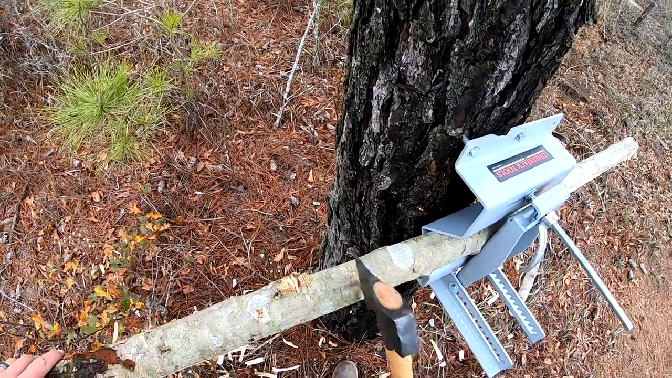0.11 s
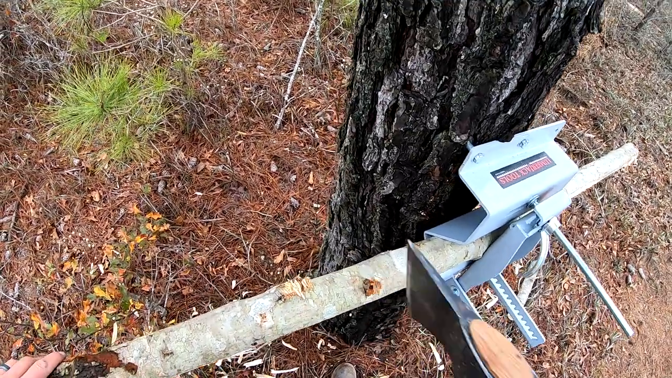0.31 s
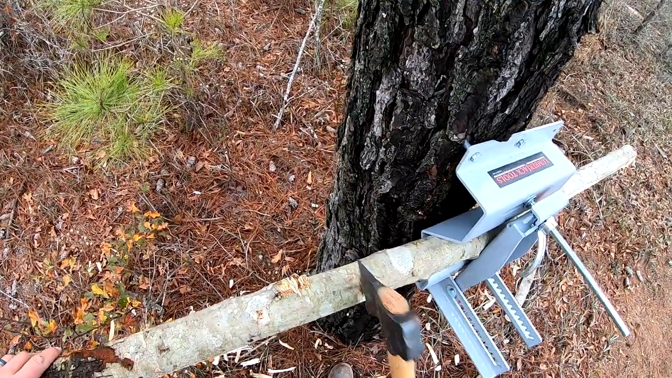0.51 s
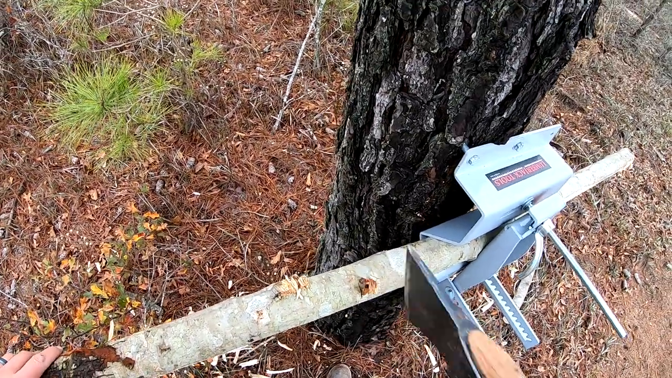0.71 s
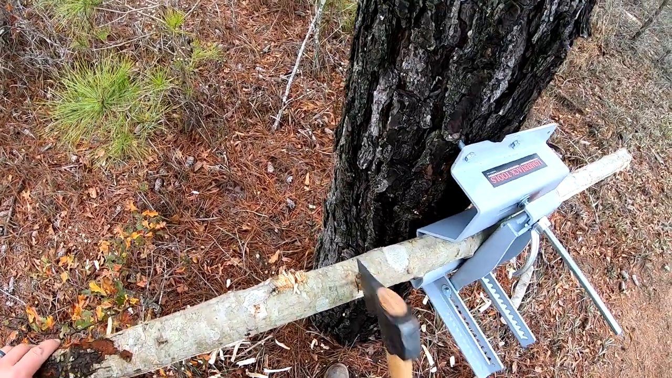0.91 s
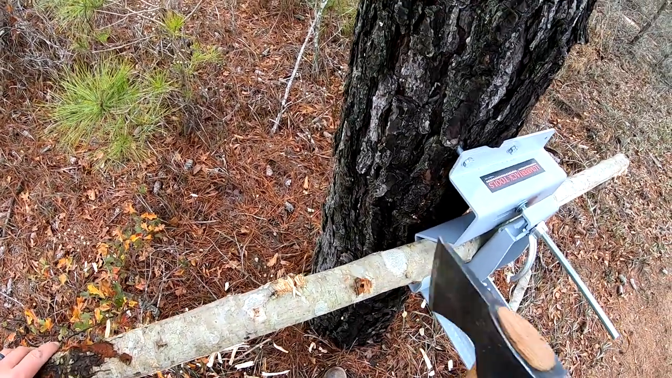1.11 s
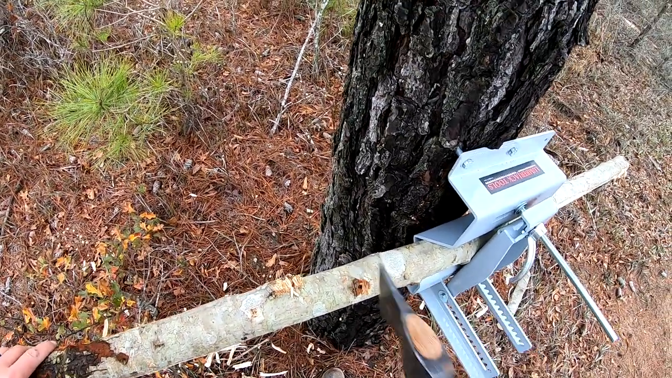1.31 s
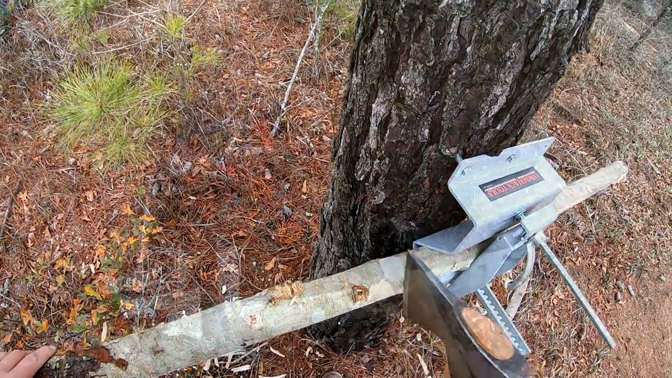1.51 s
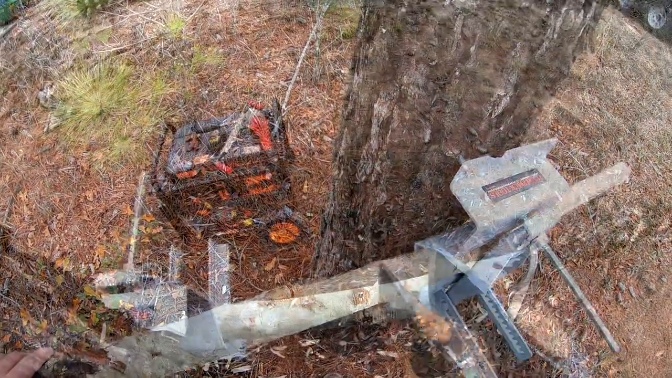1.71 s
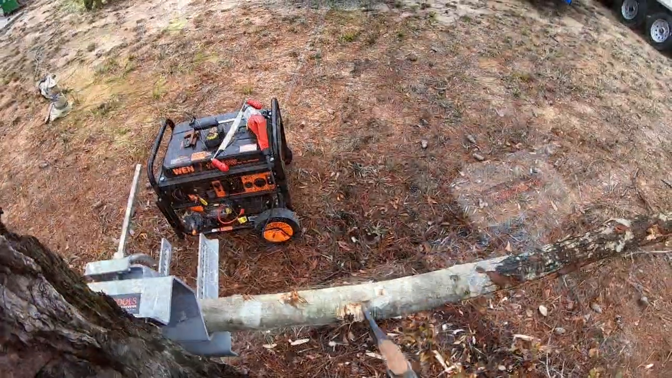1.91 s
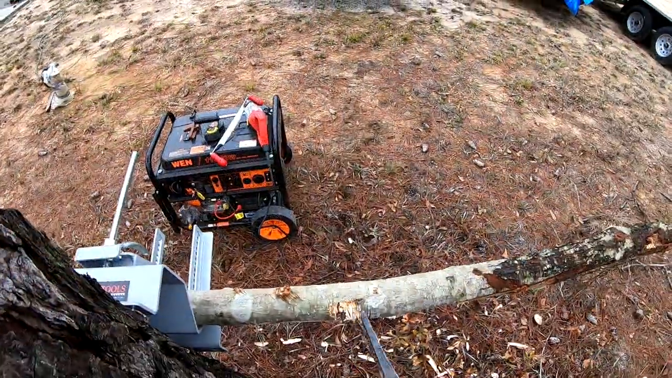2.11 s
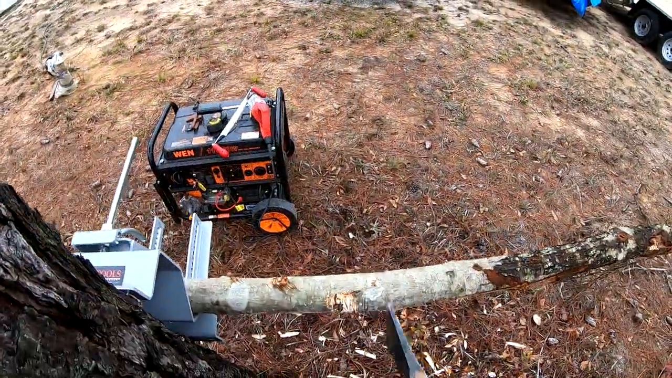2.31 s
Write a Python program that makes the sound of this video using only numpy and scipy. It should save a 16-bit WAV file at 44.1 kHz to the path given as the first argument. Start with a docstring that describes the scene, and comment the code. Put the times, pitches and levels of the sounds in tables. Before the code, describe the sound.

Close, regular hatchet chops: brief graze, sharp woody crack and crunch, then loose clamp chatter and faint metallic ringing. Near the end one blow on another log shudders as low wind swells. Outdoors among trees, microphone on the head.

```python
"""A hatchet chops at a thin log held in a steel clamp on a tree trunk, about a metre from a head-worn camera.
Each blow grazes, rings the log's decaying modes, crunches, thuds and cracks in shaped noise; the trees echo.
The clamp rattles as dense clicks through resonances and its steel rings; the blade pings and sizzles.
Late on, a second scene comes in, where a blow rings a second log with other modes and that log shudders.
Around it lie wind on the microphones, quiet woodland hiss, small ticks and faint sliding bird notes."""
import sys
import numpy as np
from scipy import signal
from scipy.fft import rfft, irfft
from scipy.io import wavfile
from scipy.ndimage import uniform_filter1d

SR = 44100
rng = np.random.default_rng(int(sys.argv[2]) if len(sys.argv) > 2 else 0)


def log_audio(samples):
    """Write samples as a 16-bit WAV file to the path given in sys.argv[1]."""
    # one column per channel
    frames = np.atleast_2d(samples).T
    # limit to full scale, then quantise
    limited = np.clip(frames, -1, 1)
    pcm = np.round(limited * 32767).astype(np.int16)
    wavfile.write(sys.argv[1], SR, pcm)


N = 105840
LEAD = SR // 4  # samples made ahead of the scene, so earlier sounds can ring into it
PORT_LEAD_S = 2e-5  # the left port hears the sound this much before the right
RISE_CYCLES = 0.15  # time constant of each mode's onset, in its own cycles


def undb(db):
    """Decibels to amplitude."""
    return 10 ** (np.asarray(db) / 20)


def unit(x):
    """Scale to an rms of 1, over both channels together."""
    return x / np.sqrt(np.mean(x ** 2))


def clock():
    """Time in seconds, starting a little before the scene."""
    return (np.arange(N + LEAD) - LEAD) / SR


def level_curve(points):
    """Level in dB over time, drawn straight between (time [s], level [dB]) points."""
    return np.interp(clock(), *np.array(points).T)


def colour(x, points):
    """Filter by (frequency [Hz], level [dB]) points; silent outside them."""
    hz, db = np.array(points, float).T
    f = np.fft.rfftfreq(x.shape[-1], 1 / SR) + 1  # the extra 1 Hz avoids log(0)
    inside = (f >= hz[0]) & (f <= hz[-1])
    gain = undb(np.interp(np.log(f), np.log(hz), db)) * inside
    return irfft(rfft(x) * gain, x.shape[-1])


def spread(mid, side, wide):
    """Mid and side to left and right; the left port hears a moment earlier."""
    turn = np.exp(1j * np.pi * np.fft.rfftfreq(len(mid), 1 / SR) * PORT_LEAD_S)
    left_right = [mid + wide * side, mid - wide * side]
    return irfft(rfft(left_right) * [turn, 1 / turn], len(mid))


def hiss(points, wide):
    """Stereo coloured noise of rms 1."""
    mid, side = colour(rng.standard_normal((2, N + LEAD)), points)
    return unit(spread(mid, side, wide))


def walk(rate):
    """Smooth random wander of rms 1, with about `rate` new values a second."""
    k = int(SR / rate)
    steps = np.repeat(rng.standard_normal((N + LEAD) // k + 1), k)
    return unit(uniform_filter1d(steps, k)[:N + LEAD])


def ring(modes, seconds):
    """Stereo impulse response of decaying modes; neighbours start opposite, low ones swell later."""
    t = np.arange(int(seconds * SR)) / SR
    hz, db, t60, lead, pan_db = np.array(modes, float).T[:, :, None]
    sign = (-1.) ** np.arange(len(modes))[:, None]
    swell = sign * (1 - np.exp(-t * hz / RISE_CYCLES))
    ears = []
    for side in (1, -1):  # left, right
        decay = undb(db + side * pan_db / 2 - 60 * t / t60)
        tone = np.sin(2 * np.pi * hz * t + side * lead / 2)
        ears.append(np.sum(swell * decay * tone, axis=0))
    return np.array(ears)


def add(out, s, x):
    """Mix x into out at s seconds, cut at the end."""
    i = int(s * SR) + LEAD
    x = x[..., :out.shape[-1] - i]
    out[..., i:i + x.shape[-1]] += x


def resonate(x, peaks):
    """Sum of resonant band-passes."""
    return sum(undb(db) * signal.lfilter(*signal.iirpeak(hz, hz / width, SR), x) for hz, width, db in peaks)


def clicks(rate, scatter_db):
    """Two streams of dense clicks at random moments with uneven levels."""
    shape = (2, N + LEAD)
    struck = rng.random(shape) < rate / SR
    return struck * rng.standard_normal(shape) * undb(scatter_db * rng.exponential(size=shape))


def burst(s, db, hold_s, sag_db_s, t60):
    """Envelope with a quick rise, a slow sag while held, then a decay."""
    t = clock() - s
    rise = (t >= 0) * np.clip(t / 0.0013, 0, 1)
    sag = sag_db_s * np.clip(t, 0, hold_s)
    decay = 60 * np.clip(t - hold_s, 0, 9) / t60
    return rise * undb(db - sag - decay)


# wind strength before its flicker: (time [s], level [dB])
WIND_LEVEL = [(0.0, -57.5), (0.18, -64), (0.56, -73), (0.81, -61.5), (1.0, -57), (1.22, -66.5),
              (1.42, -68.5), (1.56, -41), (1.88, -57.5), (2.04, -40), (2.17, -47.5), (2.4, -52.5)]
# low rumble of wind on the ports: (frequency [Hz], relative level [dB])
WIND_COLOUR = [(15, -11), (25, -2), (45, -7.5), (75, 0), (110, -6.5), (160, -15.5), (250, -21), (400, -39)]
WIND_FLICKER_DB, WIND_WIDE = 3, .55


def wind():
    """Wind buffets the ports: low noise with a drawn level and a random flicker."""
    level_db = level_curve(WIND_LEVEL) + WIND_FLICKER_DB * walk(12)
    return hiss(WIND_COLOUR, WIND_WIDE) * undb(level_db)


# soft hiss of the wood: (frequency [Hz], relative level [dB])
AIR_COLOUR = [(70, -8), (130, -5), (250, -7.5), (450, -17.5), (700, -17), (1100, -24), (1700, -29.5),
              (2700, -36), (4500, -40.5), (7500, -43.5), (9000, -49), (11000, -68.5)]
# strength of that hiss before its flicker: (time [s], level [dB])
AIR_LEVEL = [(0.0, -55.5), (1.0, -60), (1.18, -61.5), (1.43, -61), (1.55, -58.5), (1.85, -52.5),
             (2.02, -47.5), (2.27, -50.5), (2.4, -56.5)]
AIR_WIDE, AIR_FLICKER_DB = 0.49, 1


def woodland_air():
    """The wood hisses softly: broad noise with a drawn level and a slight flicker."""
    level_db = level_curve(AIR_LEVEL) + AIR_FLICKER_DB * walk(7.11)
    return hiss(AIR_COLOUR, AIR_WIDE) * undb(level_db)


# first-scene blows: (time [s], knock level [dB], contact [ms], crack level [dB], second graze level [dB],
# rebound level [dB], rattle level [dB], rattle hold [s]); knock, graze and rebound scale the log's modes
FIRST_SCENE_BLOWS = [(-.18, -22, .5, -32, -44, -30, -41, 0.13),
                     (.2213, -14.5, 0.55, -22, -37, -39, -43.5, .11),
                     (.6233, -15.5, 0.44, -26, -38, -34, -42.5, 0.14),
                     (1.0255, -19, 0.49, -21, -45, -39.5, -38.5, 0.083),
                     (1.4443, -18.5, 0.62, -36.5, -39, -23.5, -37.5, 0.095),
                     (1.8425, -19.5, 0.54, -26.5, -41.5, -58, -43, 0.11),
                     (1.3915, -35.5, 0.56, -40, -68.5, -58, -53.5, 0.1),
                     (2.235, -37, 0.54, -41.5, -56, -46.5, -66, 0.0082)]
# second-scene blows, same columns
SECOND_SCENE_BLOWS = [(1.954, -55, 2, -67, -76, -46.5, -61.5, 0.016),
                      (2.0493, -21.5, 0.93, -23, -70, -35.5, -36.5, 0.064)]
# modes of the first log:
# (frequency [Hz], relative level [dB], t60 [s], left phase lead [rad], left minus right [dB])
FIRST_LOG = [(151.7, -1.5, 0.089, .08, -2), (197.8, 2.5, 0.049, .15, 3), (148.24, -7.5, 0.31, 0.074, -0.5),
             (433, -3, 0.036, 0.18, -2.5), (566.6, -4.5, 0.038, .2, -8), (761.5, 3, 0.057, 0.44, -1.),
             (900, -6, 0.051, .35, -10), (1110.5, -7, 0.12, 1, -5), (1264, -3.5, 0.058, 0.4, -7),
             (1456, -1.5, 0.066, 0.23, -10), (2117, 7, 0.026, 0, -10), (2346, -8, 0.022, 0.708, -11.5),
             (2750, -12, 0.12, 0.85, -5), (3420, -15.5, .03, 0, -6)]
# modes of the second log, same columns
SECOND_LOG = [(136.5, 4.5, 0.17, 0.038, 0.), (256, -4.5, 0.053, 0.11, 0.85), (315, -10, .06, 0, 0.87),
              (487, 5, 0.025, .2, 1.), (600, 1.5, 0.066, 0.21, 0.75), (850, -6, 0.044, 1, 0.85),
              (1375, 10, .05, .6, 0.82), (1520, -2, 0.041, .6, 1.), (2220, -8, 0.026, 0.4, 1.),
              (2800, -10, .03, 0.85, 1.)]
FIRST_GRAZE_LEAD_S, SECOND_GRAZE_LEAD_S, REBOUND_S = .0215, .011, .008  # before, before, after the bite
FIRST_GRAZE_DB = -10.5  # relative to the second graze
MODE_SCATTER_DB = 1.5  # each blow excites the modes a little differently


def log_knocks(blows, modes):
    """The edge grazes twice, bites and rebounds; each half-sine push rings the log's modes."""
    out = np.zeros((2, N + LEAD))
    for s, knock_db, contact_ms, _, graze_db, rebound_db, _, _ in blows:
        phase = np.clip(np.arange(200) / SR / (contact_ms / 1000), 0, 1)
        push = np.sin(np.pi * phase)[None]
        push = push / push.sum()
        varied = np.array(modes, float)
        varied[:, 1] += MODE_SCATTER_DB * rng.standard_normal(len(modes))
        knock = signal.fftconvolve(ring(varied, 0.36), push)
        graze = signal.fftconvolve(ring(varied[3:7], 0.36), push)  # a graze wakes only four modes
        add(out, s - FIRST_GRAZE_LEAD_S, undb(graze_db + FIRST_GRAZE_DB) * graze)
        add(out, s - SECOND_GRAZE_LEAD_S, undb(graze_db) * graze)
        add(out, s, undb(knock_db) * knock)
        add(out, s + REBOUND_S, undb(rebound_db) * knock)
    return out


# crushed fibres: (frequency [Hz], relative level [dB])
CRUNCH_COLOUR = [(180, -28), (260, 2.5), (500, 1), (1000, -0.5), (1600, -7), (2500, -6.5), (4000, -22)]
GRAZE_HISS_DB, GRAZE_RISE_S = -5, 0.0074  # level relative to the second graze
CRUNCH_DB, CRUNCH_HOLD_S, CRUNCH_T60_S = -6, 0.0092, 0.066  # level relative to the knock
CRUNCH_WIDE = .15


def fibre_crunch(blows):
    """Hiss grows as the edge grazes in, then crushed fibres crunch and die away."""
    level = 0
    for s, knock_db, _, _, graze_db, _, _, _ in blows:
        t = clock() - s
        approach = (t < 0) * np.exp(np.minimum(t, 0) / GRAZE_RISE_S)
        level = level + undb(graze_db + GRAZE_HISS_DB) * approach
        level = level + burst(s, knock_db + CRUNCH_DB, CRUNCH_HOLD_S, 0, CRUNCH_T60_S)
    return level * hiss(CRUNCH_COLOUR, CRUNCH_WIDE)


# dull thud: (frequency [Hz], relative level [dB])
THUD_COLOUR = [(22, -14), (40, -10), (62, 6.5), (85, -7.5), (110, -24)]
THUD_DB, THUD_PEAK_S, THUD_WIDE = -22.5, 0.029, .5  # level relative to the knock


def dull_thud(blows):
    """Deep noise swells just after each blow and sinks again."""
    swell = 0
    for s, knock_db, *_ in blows:
        u = np.clip(clock() - s, 0, 9) / THUD_PEAK_S
        swell = swell + undb(knock_db + THUD_DB) * u * np.exp(1 - u)
    return swell * hiss(THUD_COLOUR, THUD_WIDE)


TREES_DB, TREES_T60_S = -20, 0.42


def tree_echo(hits):
    """The trees return the hits above 900 Hz as a diffuse noise tail, starting 10 ms late."""
    t = np.arange(SR // 2) / SR
    tail = rng.standard_normal((2, len(t))) * undb(-60 * t / TREES_T60_S) * (t > .01)
    tail = tail / np.sqrt(np.sum(tail ** 2) / 2)
    bright = signal.sosfilt(signal.butter(2, 900, "high", fs=SR, output="sos"), hits)
    return undb(TREES_DB) * signal.fftconvolve(bright, tail, axes=1)[:, :N + LEAD]


# bright crack: (frequency [Hz], relative level [dB])
CRACK_COLOUR = [(880, -12.5), (1500, 3), (1710, -32), (2660, -8.5), (4240, -18.5), (6760, -22.5),
                (7540, -24), (9010, -28), (12000, -66), (16000, -61)]
CRACK_T60_S, CRACK_WIDE = 0.053, 0.48


def crack():
    """A short bright noise burst at every blow."""
    blows = FIRST_SCENE_BLOWS + SECOND_SCENE_BLOWS
    level = sum(burst(b[0], b[3], 0.001, 0, CRACK_T60_S) for b in blows)
    return hiss(CRACK_COLOUR, CRACK_WIDE) * level


# body of the clamp's chatter: (frequency [Hz], relative level [dB])
RATTLE_COLOUR = [(150, -16), (250, 1.5), (519, -7.5), (1310, -13.5), (1670, -22.5), (2670, -8.5),
                 (6470, -18), (7980, -14), (9010, -26), (13400, -70), (16000, -71.5)]
# resonances of the loose steel: (frequency [Hz], width [Hz], relative level [dB])
RATTLE_PEAKS = [(1323, 43, -7.5), (2040, 14, -10), (2582, 48, -10.5), (3160, 25, -49), (3336, 33, -11.5),
                (3364, 45, -11.5), (4075, 16, -9), (4463, 52, -11), (4690, 27, -15), (5270, 18, -13.5),
                (5830, 33, -14.5), (7560, 40, -15)]
RATTLE_PER_S, RATTLE_SCATTER_DB = 5000, 2.5  # clicks per second, unevenness
RATTLE_SAG_DB_S, RATTLE_T60_S, RATTLE_WIDE = 73, 0.21, 0.3
RATTLE_RING_DB = -0.5  # resonances relative to the body
RATTLE_PATCHY_DB, SECOND_DULL_HZ = 1.5, 6500


def flat_clicks():
    """Nearly flat clicks, band-limited, to drive resonances."""
    return colour(clicks(RATTLE_PER_S, RATTLE_SCATTER_DB), [(300, 0.011), (12000, 0.0048)])


def clamp_rattle():
    """Loose steel chatters until the log comes to rest; the second scene's rattle is duller."""
    body = unit(colour(clicks(RATTLE_PER_S, RATTLE_SCATTER_DB), RATTLE_COLOUR))
    resonant = unit(resonate(flat_clicks(), RATTLE_PEAKS))
    mid, side = body + undb(RATTLE_RING_DB) * resonant
    chatter = unit(spread(mid, side, RATTLE_WIDE)) * undb(RATTLE_PATCHY_DB * walk(70))
    dull = signal.lfilter(*signal.butter(2, SECOND_DULL_HZ, fs=SR), chatter)
    first, second = (sum(burst(b[0], b[6], b[7], RATTLE_SAG_DB_S, RATTLE_T60_S) for b in blows)
                     for blows in (FIRST_SCENE_BLOWS, SECOND_SCENE_BLOWS))
    return chatter * first + dull * second


# the clamp settles: (time [s], level of the other modes [dB], level of the long-ringing mode [dB])
CLINKS = [(-.08, -64, -63), (.29, -68, -70), (.705, -62, -56), (1.09, -67, -69), (1.53, -66, -71),
          (1.9, -63, -68), (2.14, -70, -80)]
# other steel modes:
# (frequency [Hz], relative level [dB], t60 [s], left phase lead [rad], left minus right [dB])
STEEL = [(800, -3, .5, .3, 0.), (2390, -3, .18, .5, 0.), (2740, -6, .18, .6, 0.), (3391, -6, .15, .8, 0.),
         (3989, -5, .22, .8, 0.), (4330, -7, .25, 1.5, 0.), (4840, -6, .2, 1.5, 0.), (5970, 0., .3, .8, 0.),
         (6880, -7, .18, .9, 0.), (9986, -6, .28, 1.6, 0.)]
STEEL_LONG_HZ, STEEL_LONG_T60_S, STEEL_RISE_S = 1782, 1.44, .028  # the long-ringing mode; rise of all


def clamp_ring():
    """The settling clamp's steel rings in thin, softly rising, lasting tones."""
    out = np.zeros((2, N + LEAD))
    rise = 1 - np.exp(-np.arange(SR) / SR / STEEL_RISE_S)
    others = ring(STEEL, 1)
    long_mode = ring([(STEEL_LONG_HZ, 0, STEEL_LONG_T60_S, .6, 0)], 1)
    for s, db, long_db in CLINKS:
        add(out, s, rise * (undb(db) * others + undb(long_db) * long_mode))
    return out


# small ticks: (time [s], level [dB])
TICKS = [(0.081, -55.5), (0.558, -67), (0.955, -92)]
# tones in each tick: frequency [Hz]
TICK_HZ = [3450, 5100, 6850, 8170]
TICK_T60_S = 0.0096


def ticks():
    """Stray ticks: a few high modes that die at once."""
    out = np.zeros((2, N + LEAD))
    tick = ring([(hz, 0, TICK_T60_S, .5, 0) for hz in TICK_HZ], .03)
    for s, db in TICKS:
        add(out, s, undb(db) * tick)
    return out


# bird notes: (time [s], length [s], start frequency [Hz], end frequency [Hz], level [dB])
BIRD_NOTES = [(0.116, 0.16, 7400, 8100, -79.5), (1.661, 0.023, 6050, 5300, -71),
              (1.69, 0.11, 5300, 5350, -84), (1.767, 0.029, 7600, 7160, -72)]


def birds():
    """Faint sliding whistles: swept sines with rounded ends."""
    out = np.zeros((2, N + LEAD))
    for s, length, start_hz, end_hz, db in BIRD_NOTES:
        u = np.linspace(0, 1, int(length * SR))
        swell = np.sqrt(np.sin(np.pi * u) + 1e-9)
        phase = 2 * np.pi * np.cumsum(start_hz + (end_hz - start_hz) * u) / SR
        add(out, s, undb(db) * swell * np.sin(phase))
    return out


# blade hits: (time [s], ping level [dB], sizzle level [dB])
PINGS = [(0.223, -35, -75), (.624, -52, -75.5), (1.026, -38, -52), (1.391, -55.5, -94), (1.444, -30.5, -71),
         (1.843, -31.5, -75), (2.051, -24, -53)]
# blade modes: (frequency [Hz], relative level [dB], t60 [s], left phase lead [rad], left minus right [dB])
BLADE = [(7480, 5, 0.012, 1.3, -0.5), (6070, -15, 0.0081, 0.91, -4), (8180, -11, .018, 2.4, -9.5)]
# blade sizzle: (frequency [Hz], relative level [dB])
SIZZLE_COLOUR = [(9000, -8), (11000, -3), (13500, -9.5), (15800, -23.5)]
SIZZLE_T60_S = 0.034


def blade():
    """The blade pings in short high modes and sizzles in a burst of treble noise."""
    level = sum(burst(s, sizzle_db, .003, 0, SIZZLE_T60_S) for s, _, sizzle_db in PINGS)
    out = hiss(SIZZLE_COLOUR, CRACK_WIDE) * level
    ping = ring(BLADE, 0.065)
    for s, ping_db, _ in PINGS:
        add(out, s, undb(ping_db) * ping)
    return out


# shudders of the second log: (time [s], level [dB], hold [s])
SHUDDERS = [(2.075, -35.5, 0.014), (2.087, -34, 0.023), (2.12, -47, 0.022)]
# resonances of the shudder: (frequency [Hz], width [Hz], relative level [dB])
SHUDDER_PEAKS = [(935, 160, 2.5), (1283, 47, 13), (1807, 67, -0.5), (2480, 61, 5.5), (3370, 83, -30),
                 (4040, 85, -48), (5100, 75, -28)]


def second_log_shudder():
    """The second log shudders after its blow: dense clicks through its resonances, in short bursts."""
    mid, side = resonate(flat_clicks(), SHUDDER_PEAKS)
    level = sum(burst(s, db, hold_s, 0, 0.043) for s, db, hold_s in SHUDDERS)
    return unit(spread(mid, side, 0.32)) * level


def scene():
    """Mix the hits of both scenes with their echo, the ringing steel, birds, wind and air."""
    hits = crack() + clamp_rattle() + second_log_shudder()
    for blows, modes in ((FIRST_SCENE_BLOWS, FIRST_LOG), (SECOND_SCENE_BLOWS, SECOND_LOG)):
        hits = hits + log_knocks(blows, modes) + fibre_crunch(blows) + dull_thud(blows)
    metal = clamp_ring() + ticks() + blade()
    mix = hits + tree_echo(hits) + metal + birds() + wind() + woodland_air()
    return mix[:, LEAD:]


SOFT_TOP, TOP_HZ = .7, 16300  # full-scale amplitude where peaks flatten, upper band edge


def record(dry):
    """The camera rounds the loudest peaks and cuts the top."""
    rounded = SOFT_TOP * np.tanh(dry / SOFT_TOP)
    return signal.sosfilt(signal.ellip(8, .2, 70, TOP_HZ, fs=SR, output="sos"), rounded)


dry = scene()
out = record(dry)
log_audio(out)
```